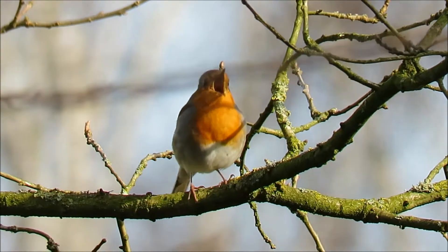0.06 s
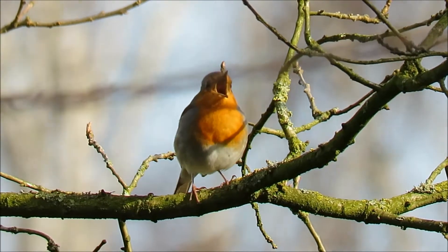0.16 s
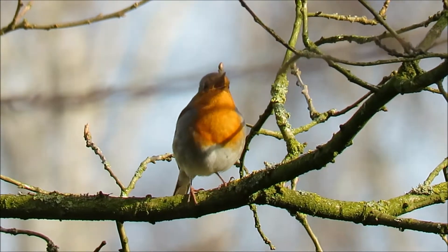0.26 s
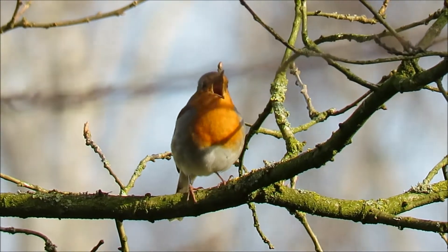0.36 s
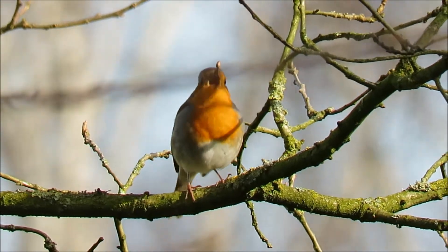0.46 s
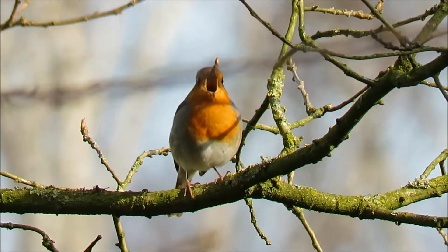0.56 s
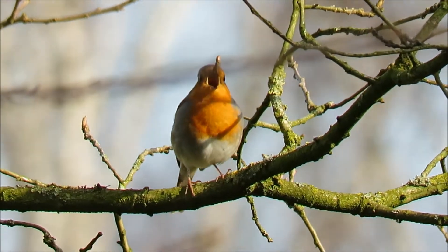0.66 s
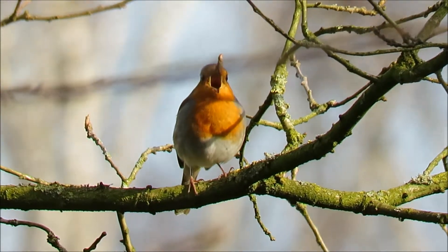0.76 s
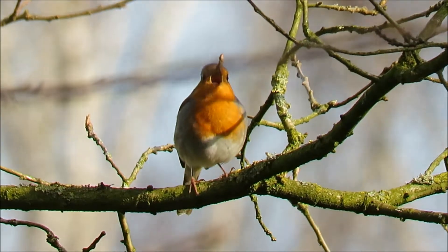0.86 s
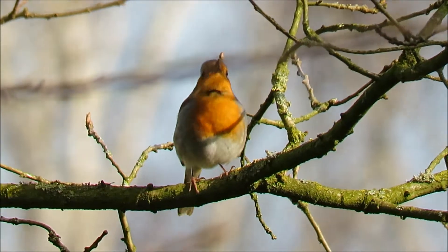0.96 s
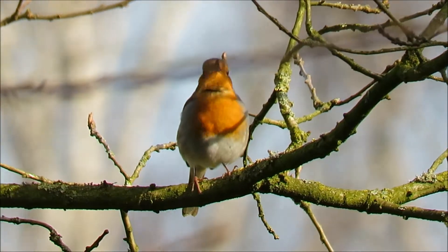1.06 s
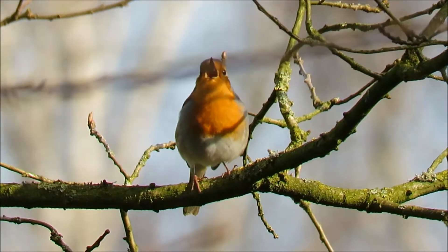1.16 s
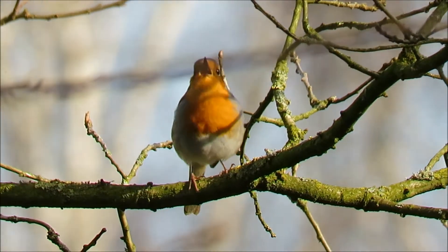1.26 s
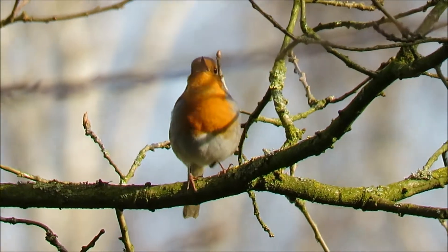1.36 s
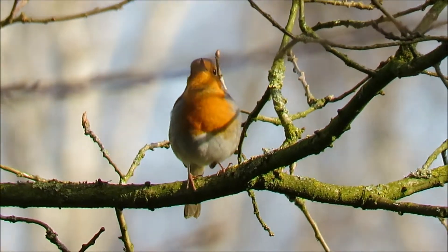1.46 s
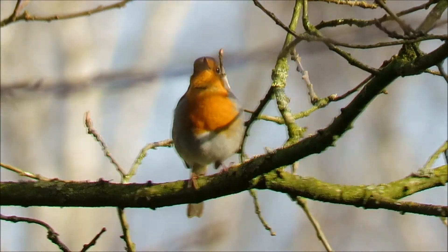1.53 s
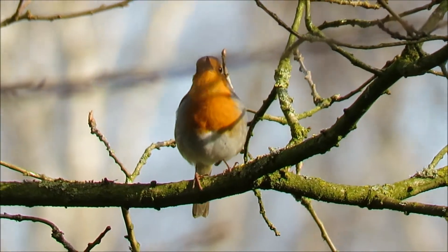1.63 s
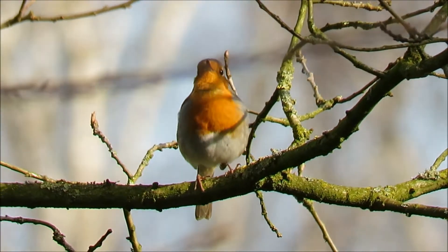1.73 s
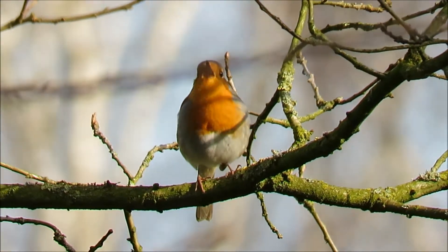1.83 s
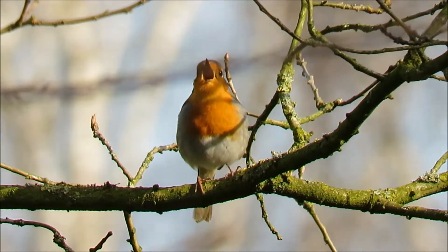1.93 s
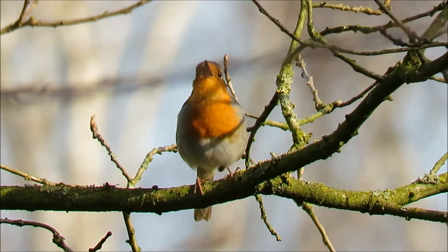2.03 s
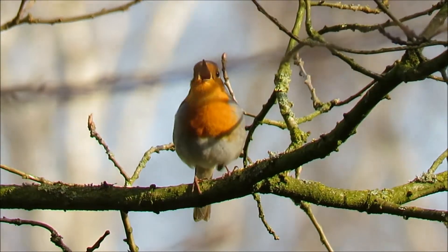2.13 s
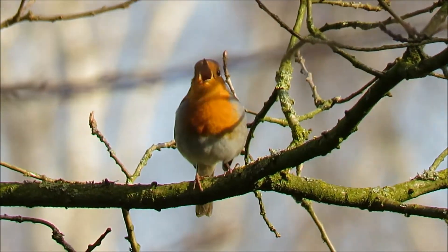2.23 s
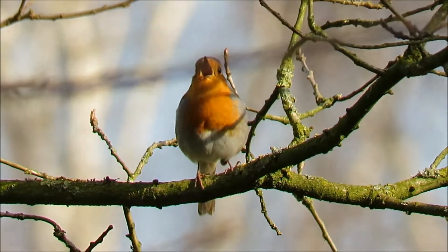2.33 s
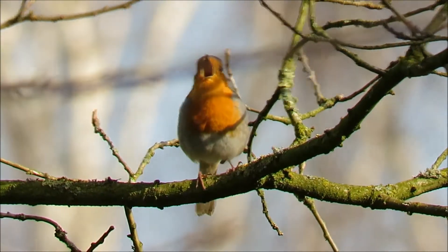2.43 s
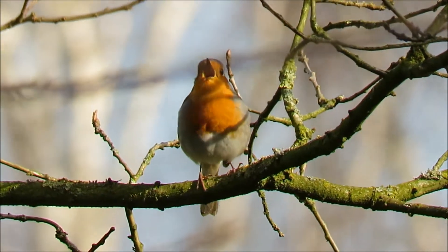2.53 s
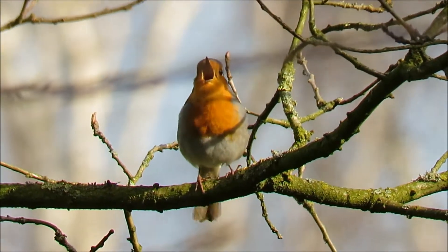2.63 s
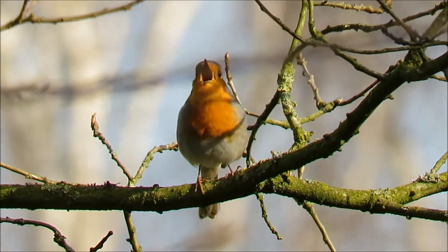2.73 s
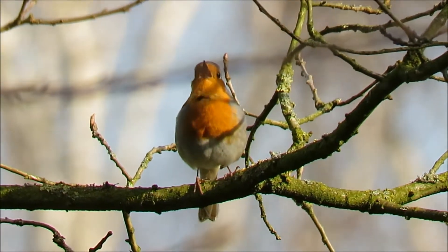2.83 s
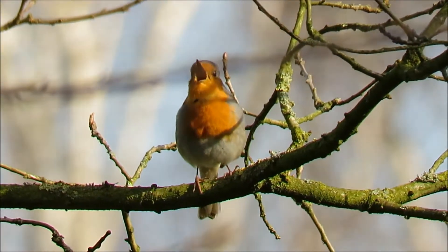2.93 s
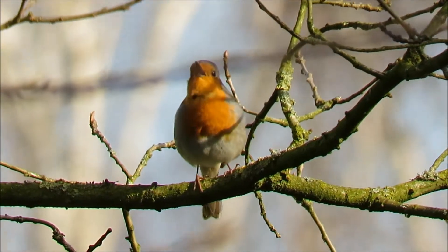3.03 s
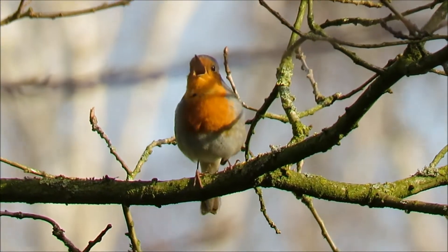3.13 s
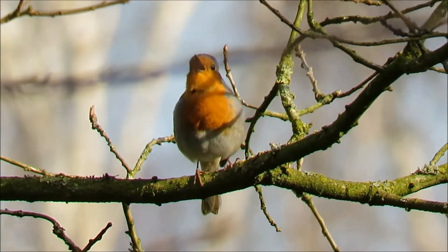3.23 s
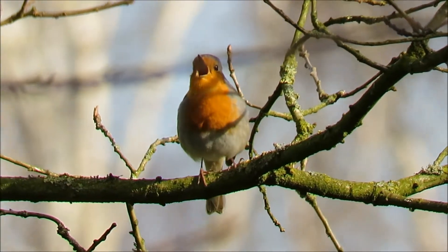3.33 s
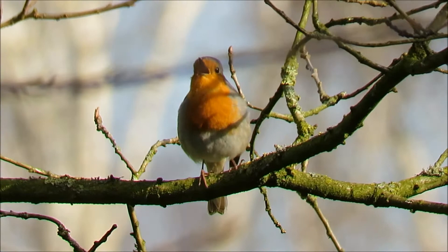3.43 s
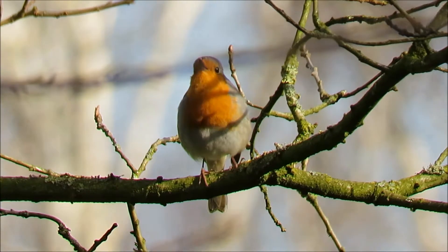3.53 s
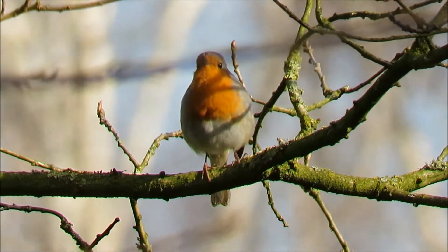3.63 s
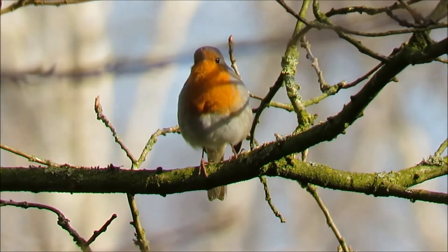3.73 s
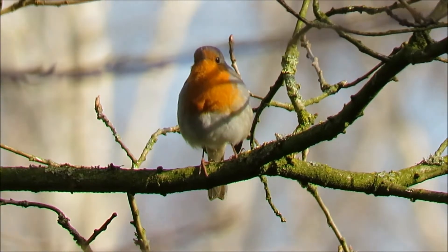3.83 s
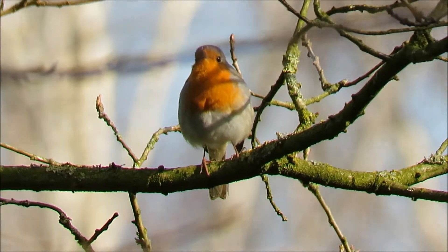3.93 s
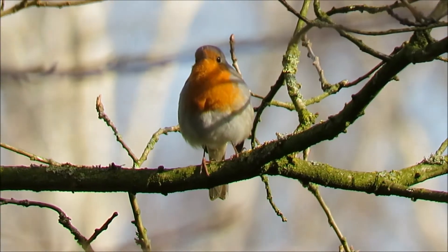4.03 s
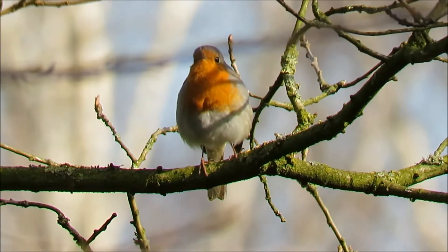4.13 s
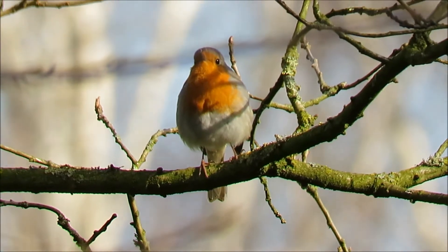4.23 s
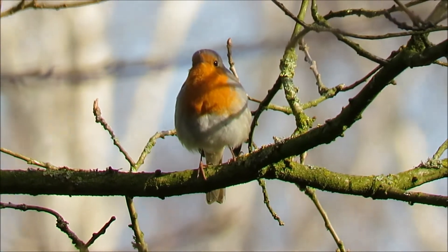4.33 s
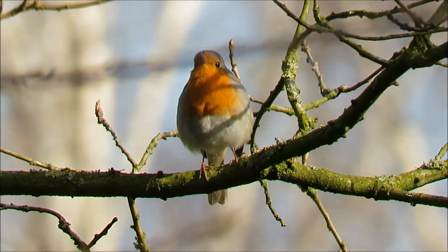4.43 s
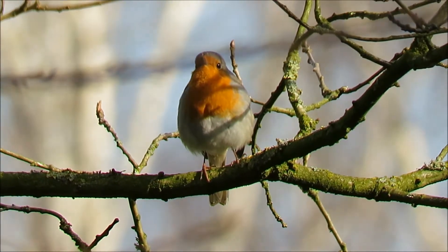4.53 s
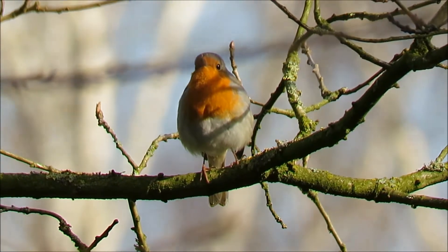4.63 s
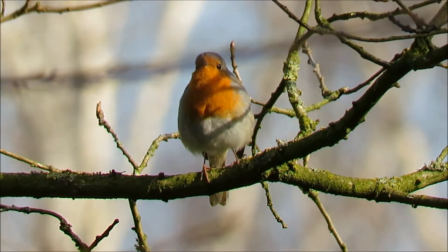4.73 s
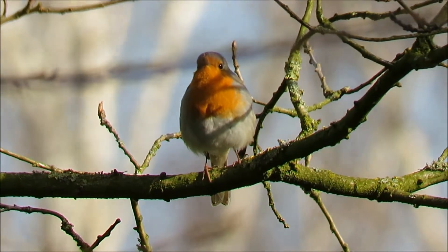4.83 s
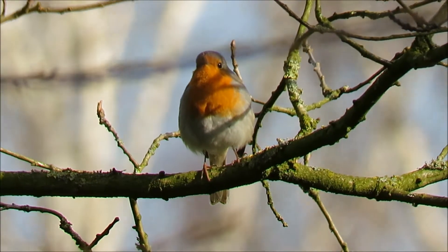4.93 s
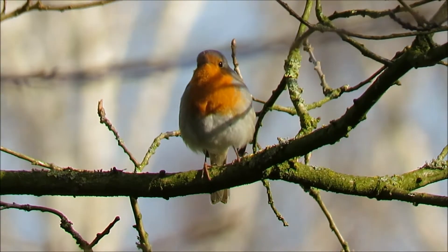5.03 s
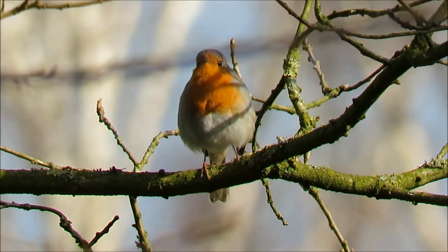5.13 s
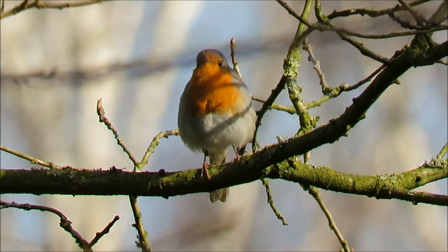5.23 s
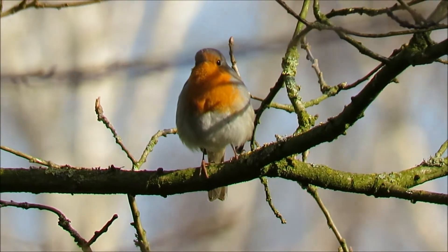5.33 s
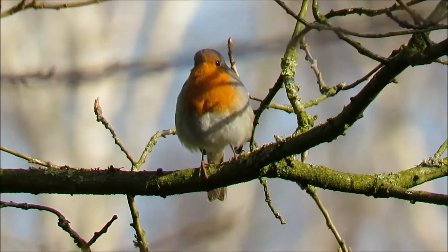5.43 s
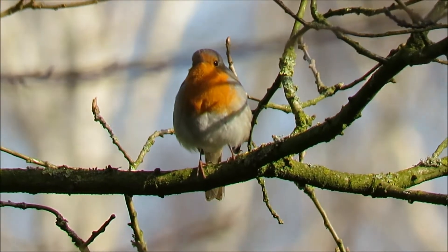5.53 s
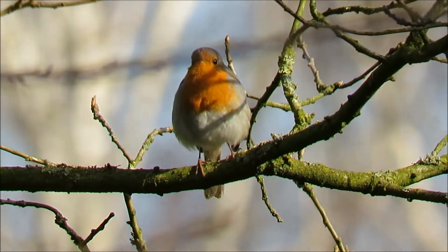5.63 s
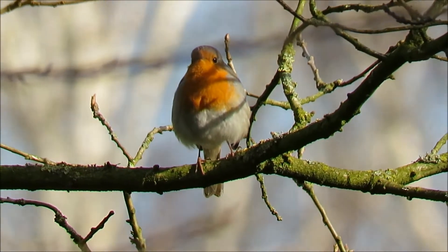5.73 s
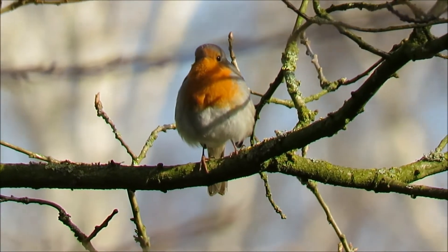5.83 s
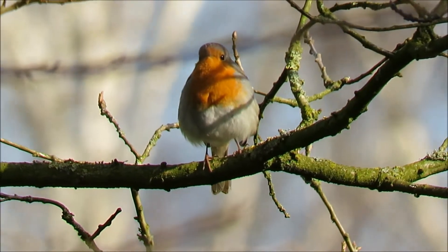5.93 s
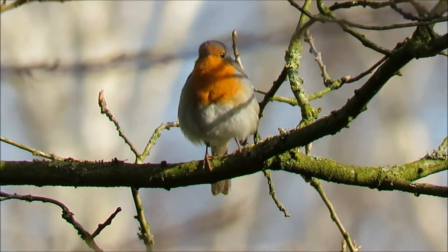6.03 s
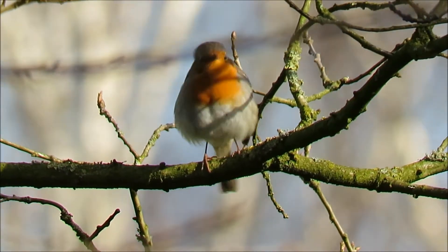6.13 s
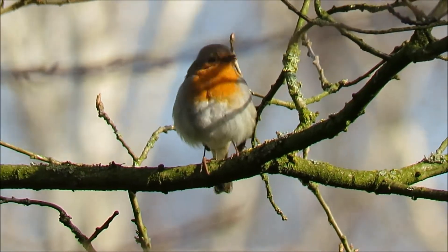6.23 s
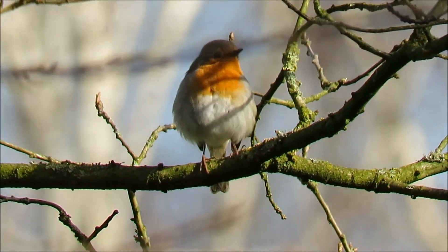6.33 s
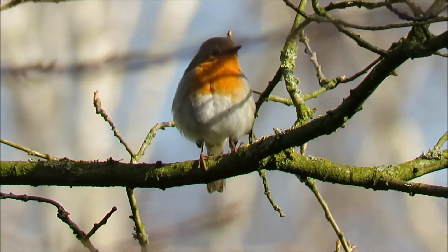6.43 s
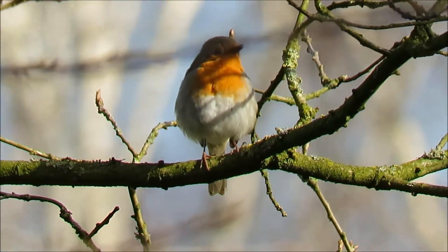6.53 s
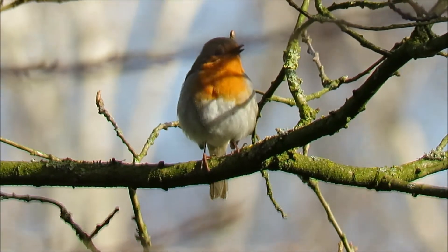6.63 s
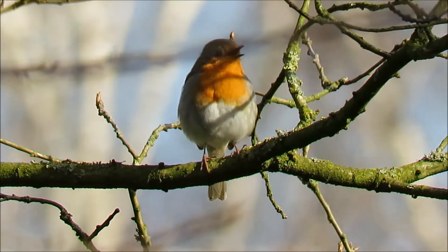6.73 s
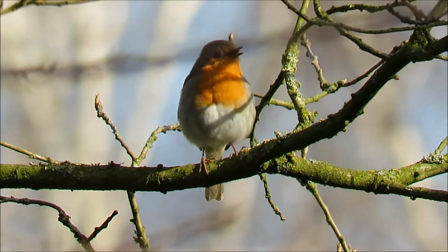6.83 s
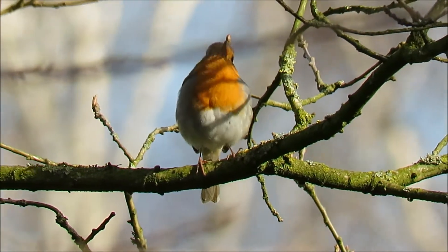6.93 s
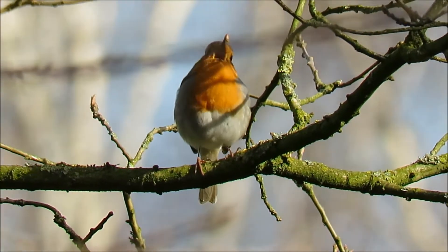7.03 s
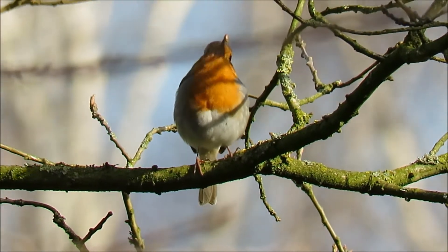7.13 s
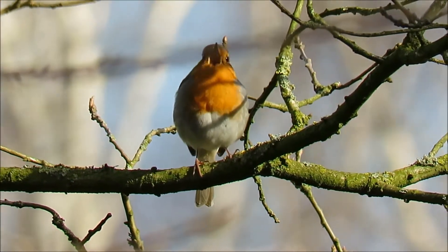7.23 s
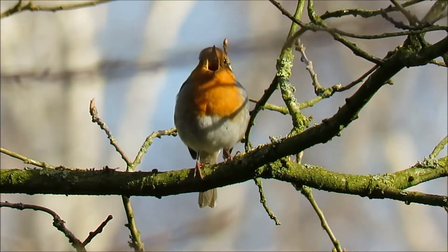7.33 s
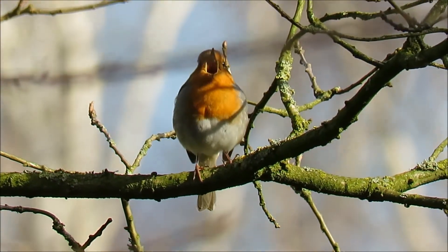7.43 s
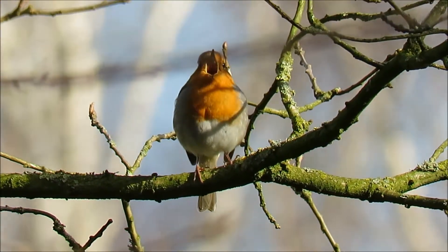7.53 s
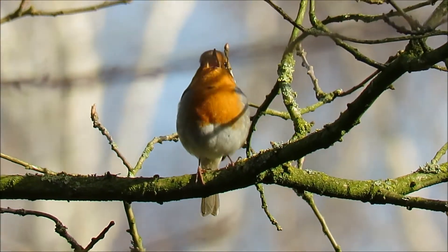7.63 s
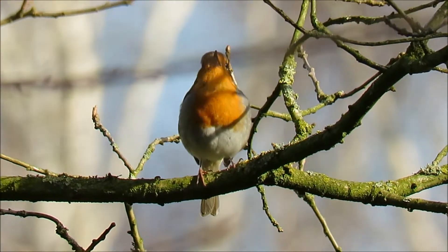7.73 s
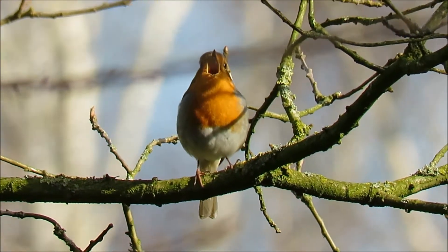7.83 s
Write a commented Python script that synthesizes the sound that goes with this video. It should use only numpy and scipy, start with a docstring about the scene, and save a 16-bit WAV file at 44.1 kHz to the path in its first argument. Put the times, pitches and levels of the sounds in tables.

```python
"""Robin in a bare wood

A robin sings from a branch: thin high slurs, a fast warble, low pure whistles, a pause, a new phrase.
Each note is one gliding tone of the syrinx, whose two sides sometimes overlap; trunks scatter it back.
A second bird repeats down-slurs further off, others call from deep in the wood.
Something knocks softly on wood once, and distant traffic rumbles as steady shaped noise."""
import sys
import numpy as np
from scipy import signal
from scipy.fft import rfft, irfft, next_fast_len
from scipy.io import wavfile
from scipy.ndimage import uniform_filter1d

SR = 44100
rng = np.random.default_rng(int(sys.argv[2]) if len(sys.argv) > 2 else 0)


def persist_wave(psi):
    """Save psi, clipped to +-1, as 16-bit WAV."""
    counts = np.round(np.clip(psi, -1, 1) * 32767).astype(np.int16)
    wavfile.write(sys.argv[1], SR, np.atleast_2d(counts).T)


N = 347067
TIME = np.arange(N) / SR

# the robin's loud pure whistles, from both sides of the syrinx: start_s, length_s, first_hz, last_hz,
# level_db, swell_db, drop_octaves, extra_scatter_db
WHISTLES = [ (2.038, 0.024, 4235, 4380, -25.5, 0, 0, -1), (2.077, 0.0064, 4360, 4340, -27, 3, 0.0031, 2),
            (2.089, 0.0062, 4400, 4170, -26, 4, 0.015, -1.5), (2.099, 0.024, 4360, 4380, -22, 1, 0.027, -1),
            (2.128, 0.022, 3850, 3985, -24, -4, 0.019, 4.5),
            (2.152, 0.031, 4267, 4315, -24.5, 5, 0.039, -2), (2.192, 0.027, 3574, 3465, -22, 1.5, 0, -1.5),
            (2.317, 0.0077, 4174, 4150, -28, -6.5, 0.033, 7),
            (2.324, 0.086, 4103, 4010, -33, 1.5, 0.054, 3.5), (2.413, 0.04, 4724, 4700, -39, 6, 0.08, 5.5),
            (2.538, 0.1, 4022, 3980, -26, 3, 0.11, 2), (2.646, 0.035, 4660, 4680, -32.5, 8, 0.029, -2),
            (2.778, .131, 4005, 3903, -24.5, 3.5, 0.13, -0.5),
            (2.909, 0.036, 4485, 4570, -37.5, -7.5, 0.031, 3.5),
            (3.069, 0.05, 3660, 3810, -30.5, -4.5, 0.05, 7), (3.135, .02, 3794, 3970, -27, -11, 0.02, 2),
            (3.27, 0.076, 3958, 3878, -27.5, 5.5, 0.02, 1),
            (3.439, 0.097, 3734, 3823, -27.5, 3, 0.0042, -7),
            (3.445, 0.017, 4290, 4360, -41.5, 5, 0.0055, 2),
            (7.817, 0.017, 3880, 4190, -34, 15, .023, 11.5),
            (7.838, 0.013, 3380, 3580, -28.5, -2, 0.024, 8.5),
            (7.849, 0.025, 4280, 4330, -26.5, 10, 0.01, 4), (7.851, .019, 3910, 3770, -31, 7, 0.066, -4), ]
# scattered sound of whistles, strongest at once, then falling away: after_note_s, level_db
WHISTLE_DECAY = [(0, 5.5), (0.021, 0.5), (0.046, -8), (.075, -9), (.11, -14.5), (.2, -26), (.4, -33),
                 (.9, -55)]
# scattered sound of the wood round a far source: after_note_s, level_db
FAR_DECAY = [(0, 8), (.025, 9), (0.051, -15), (.072, -9.5), (0.099, -9), (.2, -41), (.4, -23), (.9, -64)]
# four kinds of down-slur of the second bird: into_slur_s, pitch_hz, level_db
HIGH_SHELF = [(0, 6640, -17.5), (.007, 5300, -5), (.013, 4780, -2), (.034, 4664, 0.5), (.06, 4350, -1),
              (.084, 3440, -10)]
TWO_STEPS = [(0, 6800, -15.5), (.011, 5530, -6.5), (.029, 5320, 1), (.046, 3680, 3), (0.055, 3410, -1),
             (.082, 3400, -4), (.097, 3170, -12), (.113, 3650, -3.5), (0.124, 3930, -8)]
LOW_SHELF = [(0, 6180, -18.5), (.008, 4623, -2), (.016, 4103, 2), (.03, 3830, 2.5), (.066, 3878, 1),
             (0.088, 3230, -9)]
SLOPED_SHELF = [(0, 5600, -16), (.006, 4490, 2.5), (.012, 4175, 3.5), (.027, 4170, -4), (.044, 4070, 3.5),
                (.075, 3820, -2), (.092, 3320, -16)]


def robin():
    """One bird near the microphone; each kind of note comes back from the trees in its own way."""
    # high notes linger longer among the twigs: after_note_s, level_db
    twig_decay = [(0, 7.5), (.008, 6.5), (.025, -1), (.05, -7), (.1, -13.5), (.2, -27), (.4, -41),
                  (.9, -62.5)]
    # scattered sound of the wood close round the bird: after_note_s, level_db
    near_decay = [(0, 8.5), (.008, -2), (0.024, -10.5), (.05, -12), (.1, -21), (0.201, -32), (.4, -41.5),
                  (.9, -60)]
    high = wood(thin_slurs(), twig_decay, direct_db=-2.5, scatter_db=-6.5, alike=0.61, clump_db=-1)
    quick = wood(warble() + plunging_slur(), near_decay,
                 direct_db=-3.0, scatter_db=-6.5, alike=0.91, clump_db=1.0)
    pure = wood(whistles(), WHISTLE_DECAY,
                direct_db=-1.5, scatter_db=-11, alike=0.88, clump_db=3.5, spill=whistle_spill())
    return high + quick + pure


def thin_slurs():
    """High hissy glides that scoop up and drop at the end; those before the pause are trilled and hoarser."""
    # start_s, length_s, first_hz, last_hz, level_db, swell_db, mid_sag_octaves,
    # scoop_octaves, scoop_s, drop_octaves
    high_slurs = [ (0.0, 0.053, 8600, 7370, -39, -2.5, 0.042, 0, 0.012, 0.94),
                  (0.055, 0.046, 8650, 8220, -45.5, 5.5, 0, 0.03, 0.012, 0.51),
                  (0.109, 0.094, 9770, 6790, -35, 0, 0.17, 1.17, 0.023, 0.44),
                  (0.253, 0.069, 11720, 7410, -36, 1.5, 0.21, 1.27, 0.026, 0.59),
                  (0.273, 0.021, 6700, 6500, -38.5, -7, -0.019, 0.11, 0.0095, 0.049),
                  (0.516, 0.051, 9500, 6940, -41, -5, 0.092, 1.2, 0.014, 0.86),
                  (0.672, 0.059, 8760, 9800, -43, -6, 0.055, 0.83, 0.013, 0),
                  (0.731, 0.11, 9390, 7300, -36, 2.5, -0.072, 0.18, 0.011, 0.32),
                  (0.899, 0.056, 8300, 9130, -40, 1, 0.046, 0.14, 0.012, 0.28),
                  (6.775, 0.046, 8460, 8520, -61, 2, 0.0088, 0.12, 0.0097, 0),
                  (6.923, 0.06, 9000, 6770, -52.5, 3, -0.00085, 0.11, 0.016, 0.1),
                  (7.078, 0.041, 6550, 5650, -45, -1, 0.018, 1.15, 0.014, 0.0073),
                  (7.195, 0.013, 6400, 7070, -45.5, 11, -0.011, 0.039, 0.012, 0),
                  (7.208, 0.047, 6930, 5750, -38.5, -2.5, 0.16, 1.13, 0.013, 0),
                  (7.341, 0.048, 6680, 7230, -41, -2, -0.024, 0.046, 0.011, 0.15),
                  (7.375, 0.018, 7300, 5560, -38, 6, 0.085, 0, .01, 0),
                  (7.44, 0.018, 9000, 7330, -43.5, 7, 0, 0.045, .01, 0),
                  (7.458, 0.071, 7890, 8710, -43, 7, -0.0042, 0, 0.015, 0.12),
                  (7.546, 0.053, 8800, 8930, -43, -3, 0.017, 0.14, 0.0071, 0),
                  (7.603, 0.045, 9700, 8300, -45, 3, 0.0077, 0.3, 0.011, 0.049),
                  (7.663, 0.072, 9200, 8560, -48, -4, 0.024, 0.12, 0.0088, 0.27), ]
    pause_s = 4  # a moment within the pause
    slurs = [note(*row, drop_s=0.01, swoop_loss_db=2.0) for row in high_slurs]
    before = [n for n in slurs if n[0, 0] < pause_s]
    after = [n for n in slurs if n[0, 0] > pause_s]
    opening = syrinx(before, [-27], waver=0.0157, flutter_db=2.5, edge_s=0.002,
                     trill=0.014, trill_hz=88.9, hiss_db=-46.0, rough=0.1)
    reprise = syrinx(after, [-36], waver=0.0097, flutter_db=1.5, edge_s=0.0047, hiss_db=-49, rough=0.016)
    return opening + reprise


def plunging_slur():
    """One loud slur plunges in from above, rests on a shelf and falls away: clear, with a slight rasp."""
    # time_s, pitch_hz, level_db
    plunge_path = [(.575, 7100, -37), (.58, 5860, -27.5), (.584, 5040, -29), (.597, 4730, -24),
                   (.608, 4320, -24.5), (.614, 3460, -32), (.622, 2300, -45)]
    return syrinx([plunge_path], [-46], waver=0.0039, flutter_db=1.5, edge_s=0.0031, hiss_db=-33, rough=.12)


def warble():
    """Fast arches of pitch with short strokes between and after them, all slightly rasping."""
    # arches rise, hold and settle low: start_s, length_s, rise_s, rise_octaves, hold_s,
    # top_hz, last_hz, level_db, fade_db_per_s
    arches = [ (1.184, 0.037, 0.0074, 0.73, .004, 4540, 2700, -29, 21),
              (1.278, 0.034, 0.0081, .5, .003, 4556, 2480, -25, 198),
              (1.352, .038, 0.01, .4, 0.0069, 4900, 2550, -22, 431),
              (1.426, .033, 0.0041, .35, .014, 5190, 3010, -26.5, 143), ]
    # short strokes, mostly falling: start_s, length_s, first_hz, last_hz, level_db, mid_sag_octaves
    strokes = [ (1.13, 0.013, 2760, 2520, -45.5, -0.024), (1.139, 0.012, 3680, 3440, -32, 0.027),
               (1.153, 0.0082, 2620, 2520, -38.5, 0.014), (1.157, 0.0082, 3950, 3100, -40, -0.0068),
               (1.17, 0.0097, 2720, 2120, -36, 0.01), (1.222, .013, 2856, 2520, -28.5, .02),
               (1.238, 0.013, 3560, 3080, -37, -0.017), (1.246, 0.011, 2635, 2440, -37, -0.012),
               (1.259, 0.0071, 2390, 1950, -41, -0.046), (1.271, .008, 2910, 3060, -37, 0.014),
               (1.302, 0.01, 2740, 2430, -32.5, 0.023), (1.311, 0.0065, 2460, 2020, -46, -0.026),
               (1.323, 0.0098, 2120, 2400, -43.5, -0.031), (1.335, 0.014, 2720, 2580, -35.5, -0.016),
               (1.406, 0.017, 3100, 2540, -38.5, 0.058), (1.527, .027, 4036, 2540, -30, -.07),
               (1.635, 0.017, 3570, 3400, -42, 0.033), (1.629, 0.058, 2910, 2110, -58, -0.014),
               (1.812, 0.012, 3904, 4360, -32, -0.036), (1.823, 0.02, 3670, 2775, -38.5, 0.2),
               (1.905, .021, 3496, 3250, -40, 0.0058), (1.91, .045, 2800, 1935, -50.5, 0.065),
               (7.339, 0.0098, 4210, 4380, -44, -0.023), ]
    chirps = [arch(*row) for row in arches]
    chirps += [note(*glide, swell_db=-7.0, sag=sag) for *glide, sag in strokes]
    return syrinx(chirps, [-48, -45], waver=0.019, flutter_db=3.0, edge_s=.0028, hiss_db=-47.0, rough=0.035)


def whistles():
    """Nearly pure held tones with faint overtones; three upsweeps lead into whistles before the pause."""
    # very short whistles dip in the middle: length_s, sag_octaves
    whistle_sag = [(.02, .03), (.05, 0.0016), (.1, 0), (.13, .01)]
    # three upsweeps shortly before the pause: start_s, length_s, last_hz, level_db, scoop_s
    upsweeps = [(3.013, 0.042, 3610, -23.5, .018), (3.217, 0.042, 3530, -24, 0.039),
                (3.406, .028, 3555, -25.5, .027)]
    notes = []
    for s, length, *glide, drop, _ in WHISTLES:
        sag = np.interp(length, *np.transpose(whistle_sag))
        # the negative scoop enters from slightly above
        notes.append(note(s, length, *glide, sag=sag, scoop=-.025, scoop_s=0.0062,
                          drop=drop, drop_s=0.015, swoop_loss_db=56.5))
    for s, length, hz, db, scoop_s in upsweeps:
        notes.append(note(s, length, hz * 0.95, hz, db, scoop=0.37, scoop_s=scoop_s, swoop_loss_db=52.5))
    return syrinx(notes, [-51, -52], waver=0.0036, flutter_db=1.24, edge_s=0.0032)


def whistle_spill():
    """How strongly the whistle of the moment is thrown into the trees, as a gain."""
    starts, spill_db = np.transpose(sorted((row[0], row[-1]) for row in WHISTLES))
    current = np.maximum(np.searchsorted(starts, TIME) - 1, 0)
    return uniform_filter1d(from_db(spill_db)[current], size=128)  # smooth the steps over 3 ms


def syrinx(notes, overtones_db, waver, flutter_db, edge_s, trill=0, trill_hz=100, hiss_db=-90, rough=0):
    """One gliding tone a note, with optional weak overtones, unsteadiness, trill, rasp and hiss."""
    # the beak favours some overtones: overtone_hz, gain_db
    overtone_colour = [(7000, 2.5), (8500, 6), (10500, -9), (11400, -0.5), (12300, 8.5), (13200, -3),
                       (15000, -1.5)]
    out = np.zeros(N)
    bend = 1 + waver * drift(150) + trill * np.sin(2 * np.pi * trill_hz * TIME + drift(15))
    pressure_db = flutter_db * drift(56)
    # irregular vibration spreads a skirt round the tone
    rasp = 1 + rough * drift(550)
    hiss = from_db(hiss_db) * rms_one(band_passed(rng.standard_normal(N), 13000, 16000))
    for rows in notes:
        s, hz, db = np.transpose(rows)
        first, last = int((s[0] - edge_s / 2) * SR), int((s[-1] + edge_s / 2) * SR)
        span = slice(max(first, 0), last)
        t = TIME[span]
        pitch = np.interp(t, s, hz)
        phase = 2 * np.pi * np.cumsum(pitch * bend[span]) / SR
        tone = np.sin(phase)
        for k, overtone_db in enumerate(overtones_db, 2):
            gain = from_db(overtone_db + at_hz(overtone_colour, k * pitch))
            tone += gain * np.sin(k * phase) * (k * pitch < SR / 2)
        # high pitch and a fast sweep (Hz per s) both make the airflow hiss more
        sweep = np.abs(np.gradient(pitch)) * SR
        tone = tone * rasp[span] + hiss[span] * (pitch / 7500) ** 2 * (1 + sweep / 150000)
        # the valve opens and shuts within a few milliseconds
        to_edge = np.minimum(t - t[0], t[-1] - t)
        gate = np.sin(np.pi / 2 * np.clip(to_edge / edge_s, 0, 1)) ** 2
        loudness = np.interp(t, s, from_db(db)) * from_db(pressure_db[span])
        out[span] += np.sqrt(2) * gate * loudness * tone
    return out


def note(s, length, first_hz, last_hz, db, swell_db=0, sag=0, scoop=0, scoop_s=.01, drop=0, drop_s=.01,
         swoop_loss_db=0):
    """Rows (s, Hz, dB) of a glide that scoops in, sags and drops out (octaves), weaker per octave of swoop."""
    along = np.linspace(0, 1, 80)
    t = along * length
    entry = scoop * np.clip(1 - t / scoop_s, 0, 1) ** 2
    leaving = drop * np.clip(1 - (t[-1] - t) / drop_s, 0, 1) ** 2
    octaves_down = entry + leaving + sag * np.sin(np.pi * along)
    hz = first_hz * (last_hz / first_hz) ** along / 2 ** octaves_down
    level_db = db + swell_db * (along - .5) - swoop_loss_db * (np.abs(entry) + np.abs(leaving))
    return np.transpose([s + t, hz, level_db])


def arch(s, length, rise, rise_octaves, hold, top_hz, last_hz, db, fade_db_per_s):
    """Rows (s, Hz, dB) of a quick rise, a hold and a flattening fall, loudest near the throat's resonance."""
    throat_hz, throat_loss_db_per_octave = 3730, 18.5
    t = np.linspace(0, length, 80)
    rising = np.clip(1 - t / rise, 0, 1)
    falling = np.clip((length - t) / max(length - rise - hold, 1e-3), 0, 1)
    hz = (last_hz + (top_hz - last_hz) * falling ** 1.7) / 2 ** (rise_octaves * rising ** 1.19)
    off_throat_db = throat_loss_db_per_octave * np.abs(np.log2(hz / throat_hz))
    return np.transpose([s + t, hz, db - fade_db_per_s * t - off_throat_db])


def wood(x, decay, direct_db, scatter_db, alike, clump_db=2.5, spill=1):
    """The direct sound plus countless small echoes, which come in clumps, tree by tree."""
    # the wood scatters notes around 5 kHz a little more: pitch_hz, gain_db
    scatter_colour = [(2000, -0.5), (3500, 2), (5000, 4), (7000, 1.5), (9000, -0.5), (15000, -0.5)]
    t = TIME[:SR]
    s, db = np.transpose(decay)
    colour = from_db(at_hz(scatter_colour, np.arange(SR // 2 + 1)))
    echoes = irfft(rfft(rng.standard_normal((2, SR))) * colour, SR)
    clumps_db = clump_db * drift(150)[:SR]
    # no echo within the first 1.5 ms
    tail = two_ears(*echoes, alike) * from_db(np.interp(t, s, db) + clumps_db) * (t > .0015)
    tail /= np.sqrt(np.sum(tail ** 2) / 2)
    scattered = signal.fftconvolve((spill * x)[None], tail, axes=1)[:, :N]
    return from_db(direct_db) * x + from_db(scatter_db) * scattered


def neighbour():
    """A second bird further off repeats plain down-slurs without overtones."""
    sound = syrinx(neighbour_notes(), [], waver=0.005, flutter_db=1.0, edge_s=0.0067)
    return wood(sound, WHISTLE_DECAY, direct_db=-0.5, scatter_db=-7.0, alike=0.8)


def neighbour_notes():
    """The second bird's slurs, each at its own pace, and the short falling tags that follow most of them."""
    # start_s, level_db, time_stretch, shape
    neighbour_slurs = [ (2.605, -53, 1, HIGH_SHELF), (2.947, -42.5, 1.2, TWO_STEPS),
                       (3.325, -45, 1.02, LOW_SHELF), (3.66, -45, 0.9, HIGH_SHELF),
                       (4.04, -45.5, 1.13, TWO_STEPS), (4.439, -44.5, 0.97, LOW_SHELF),
                       (4.775, -43.5, 1, HIGH_SHELF), (5.15, -47, 0.98, TWO_STEPS),
                       (5.511, -45, 0.98, SLOPED_SHELF), ]
    # start_s, first_hz, last_hz, level_db
    tags = [(3.765, 4400, 3840, -44.5), (4.22, 3700, 3200, -54.5), (4.555, 4340, 3990, -44.5),
            (4.877, 4590, 4100, -47), (5.634, 4340, 3900, -48)]
    tag_length_s = 0.0317
    notes = [note(s, tag_length_s, *glide, sag=-0.046) for s, *glide in tags]
    for s, db, stretch, shape in neighbour_slurs:
        t, hz, shape_db = np.transpose(shape)
        notes.append(np.transpose([s + stretch * t, hz, db + shape_db]))
    return notes


def far_birds():
    """Whistles and hoarse calls from far off, with more of the sound arriving as scatter."""
    # faint whistles deep in the wood: start_s, length_s, first_hz, last_hz, level_db, mid_sag_octaves
    far_whistles = [ (0.384, .17, 3270, 3780, -51.5, 0.13), (0.408, 0.074, 4970, 4760, -59, 0.034),
                    (0.773, 0.09, 3860, 3735, -46.5, 0.033), (0.864, 0.046, 4300, 4240, -49, 0.0084),
                    (0.92, 0.14, 2835, 2855, -51.5, 0.0077), (1.025, 0.093, 5745, 5510, -48, 0.01),
                    (1.638, 0.067, 4400, 4930, -55, -0.039), (1.779, 0.039, 2620, 2295, -60, -0.026),
                    (1.785, .03, 4750, 4800, -58, -0.02), (1.678, 0.064, 1924, 1880, -50, 0.0014),
                    (2.222, 0.08, 3620, 3970, -43.5, 0.21), (3.552, 0.049, 3560, 3460, -43.5, 0.073),
                    (3.614, 0.073, 3770, 4350, -44, -.03), (4.053, 0.13, 7270, 6900, -67, 0.043),
                    (4.269, 0.19, 7180, 5860, -71, -0.041), (5.371, 0.069, 5030, 4960, -63.5, -0.032),
                    (5.665, 0.12, 3480, 3480, -62, 0.0056), (5.905, 0.16, 3290, 3390, -61, 0),
                    (6.101, 0.24, 5260, 5200, -70, 0), (6.663, 0.028, 2495, 2740, -58, -0.032),
                    (6.918, 0.13, 3345, 3680, -52.5, -0.0058), (6.965, 0.11, 3600, 4000, -59, -0.016),
                    (2.594, 0.071, 2630, 2255, -59, 0.079), (3.05, 0.016, 2510, 2100, -54, -0.019),
                    (4.255, 0.04, 2550, 2397, -57.5, -0.002), (7.13, 0.11, 3450, 3295, -53, 0.0094),
                    (7.435, 0.18, 2090, 2042, -60.5, 0.022), (7.774, 0.074, 7800, 7260, -59.5, -0.0045), ]
    # faint, lower and hoarser calls: start_s, length_s, first_hz, last_hz, level_db
    far_calls = [(3.906, 0.014, 2534, 1990, -49.5), (4.921, 0.042, 1304, 1234, -57),
                 (4.97, .09, 1162, 1117, -52.5)]
    # from deep in the wood a note arrives as a long haze: after_note_s, level_db
    deep_decay = [(0, 7.5), (.03, -2.5), (.07, -8), (.14, -17), (.3, -23), (.9, -47)]
    husky_glide_octaves = .1  # whistles that glide more than this are huskier than level ones
    level, gliding = [], []
    for *glide, sag in far_whistles:
        rows = note(*glide, swell_db=-1.0, sag=sag)
        octaves = abs(np.log2(rows[-1, 1] / rows[0, 1]))
        (gliding if octaves > husky_glide_octaves else level).append(rows)
    clear = syrinx(level, [], waver=.009, flutter_db=2.0, edge_s=0.016, rough=.14)
    husky = syrinx(gliding + chorus_notes(), [], waver=.022, flutter_db=4.0, edge_s=.01, rough=0.19)
    calls = syrinx([note(*row) for row in far_calls], [-24],
                   waver=0.027, flutter_db=4.5, edge_s=0.0092, rough=0.25)
    return (wood(calls, FAR_DECAY, direct_db=-3.0, scatter_db=-5.5, alike=0.56)
            + wood(clear, deep_decay, direct_db=-6.5, scatter_db=-4, alike=0.93)
            + wood(husky, deep_decay, direct_db=-8.5, scatter_db=-3.5, alike=0.91))


def chorus_notes():
    """Fainter birds still: glides at random times, pitches, lengths and levels."""
    per_s, low_hz, high_hz = 60, 2605, 4396
    mean_length_s, glide_octaves, mean_db, spread_db = 0.087, .25, -75, 5
    notes = []
    for when, long, high, slope, loud in rng.random((int(per_s * TIME[-1]), 5)):
        hz = low_hz * (high_hz / low_hz) ** high
        last_hz = hz * 2 ** (glide_octaves * (2 * slope - 1))
        db = mean_db + spread_db * (2 * loud - 1)
        notes.append(note(when * TIME[-1], mean_length_s * (.5 + long), hz, last_hz, db))
    return notes


def knock():
    """A soft knock somewhere in the wood: a short rough burst through a few woody resonances."""
    # start_s, level_db, length_s
    knock_event = (7.356, -46, 0.033)
    # what a knock on wood rings with: centre_hz, filter_width_hz, gain_db
    knock_modes = [(1057, 87, 2), (2220, 400, -9.5), (2970, 470, -17)]
    s, level_db, length = knock_event
    noise, body = rng.standard_normal(N), np.zeros(N)
    for hz, width, db in knock_modes:
        b, a = signal.iirpeak(hz, hz / width, fs=SR)
        once = signal.lfilter(b, a, noise)
        body += from_db(db) * signal.lfilter(b, a, once)
    swell = np.sin(np.pi * np.clip((TIME - s) / length, 0, 1))
    burst = from_db(level_db) * swell * rms_one(body)
    return wood(burst, FAR_DECAY, direct_db=2.5, scatter_db=3.0, alike=.6)


def traffic():
    """Steady far rumble with humps of engine drone and tyre roar; the bass is alike in both ears."""
    # traffic and air, relative: pitch_hz, density_db
    rumble_spectrum = [(15, -33), (25, -20), (43, -5), (104, -5), (152, -3.5), (267, -2), (305, -1.5),
                       (826, -9), (2230, -22.5), (3440, -24.5), (4750, -29.5), (5280, -30), (6050, -32.5),
                       (12500, -44.5), (15500, -59.5)]
    # broad humps of engine drone and tyre roar: centre_hz, half_width_hz, level_db
    traffic_humps = [(93, 17, -60), (124.1, 7.2, -63), (831, 76, -58)]
    # likeness of the two ears: pitch_hz, correlation
    likeness = [(30, 0.83), (80, 1), (110, 0.97), (170, 0.52), (330, -0.013), (550, 0.17), (850, 0.64),
                (1400, 0.24), (3000, -0.066), (12000, -0.14)]
    size = next_fast_len(N, True)
    hz = np.arange(size // 2 + 1) * SR / size

    def coloured(gain):
        """Stereo noise with a given gain at each frequency; rms 1."""
        white = two_ears(*rfft(rng.standard_normal((2, size))), at_hz(likeness, hz))
        return rms_one(irfft(white * gain, size)[:, :N])

    out = from_db(-46.13) * coloured(from_db(at_hz(rumble_spectrum, hz)))
    for centre, width, db in traffic_humps:
        out += from_db(db) * coloured(1 / (1 + ((hz - centre) / width) ** 2))
    return out


def from_db(db):
    """Decibels to gain."""
    return 10 ** (np.asarray(db) / 20)


def rms_one(x):
    """Scale to rms 1."""
    return x / np.sqrt(np.mean(x ** 2) + 1e-20)


def at_hz(points, hz):
    """Read a spectrum on a log-frequency axis."""
    knots, values = np.transpose(points)
    return np.interp(np.log(hz + 1), np.log(knots), values)


def drift(rate):
    """Smooth chance with spread 1, changing about rate times a second."""
    size = next_fast_len(N, True)
    hz = np.arange(size // 2 + 1) * SR / size
    spectrum = rfft(rng.standard_normal(size)) / (1 + (hz / rate) ** 2)
    return rms_one(irfft(spectrum, size)[:N])


def two_ears(mid, side, alike):
    """Left and right with a given correlation from two unrelated signals."""
    alike = np.clip(alike, -1, 1)
    shared, apart = np.sqrt(1 + alike) * mid, np.sqrt(1 - alike) * side
    return np.array([shared + apart, shared - apart]) / np.sqrt(2)


def band_passed(x, low_hz, high_hz):
    """Keep what lies between two edges."""
    edges = np.clip([low_hz, high_hz], 10, .45 * SR)
    return signal.sosfilt(signal.butter(3, edges, "band", fs=SR, output="sos"), x)


def scene():
    """The robin almost straight ahead, a hair to the left; the wood all round."""
    left_right_db = [[.15], [-.15]]
    return robin() * from_db(left_right_db) + neighbour() + far_birds() + knock() + traffic()


def record(dry):
    """The top is cut steeply above 15.7 kHz; the sound starts and stops softly over 4 ms."""
    fade = np.clip(np.minimum(TIME, TIME[-1] - TIME) / .004, 0, 1)
    low_pass = signal.ellip(10, .05, 70, 15700, fs=SR, output="sos")
    return signal.sosfilt(low_pass, dry * fade)


dry = scene()
out = record(dry)
persist_wave(out)
```